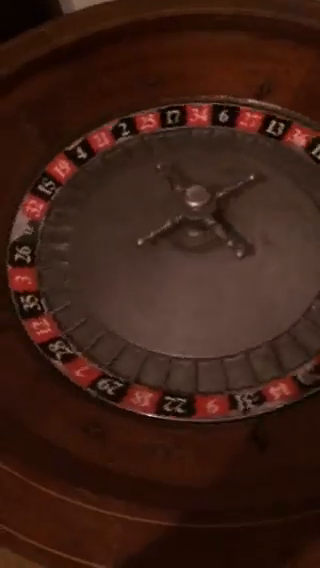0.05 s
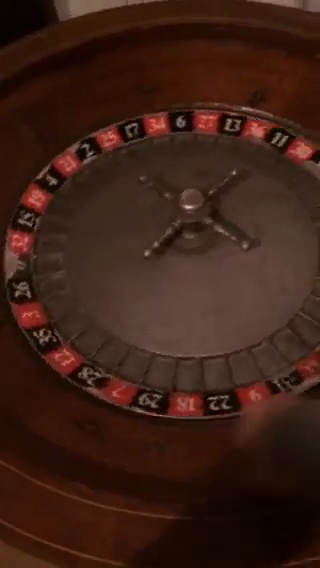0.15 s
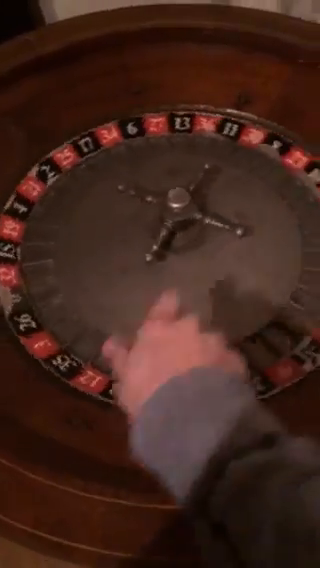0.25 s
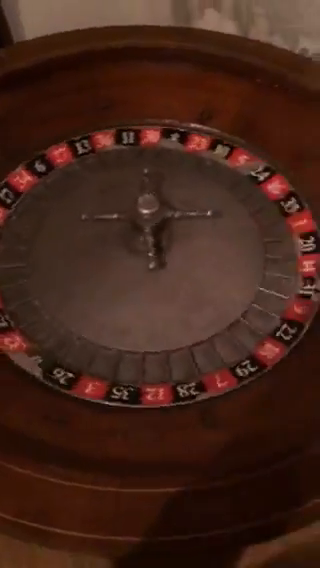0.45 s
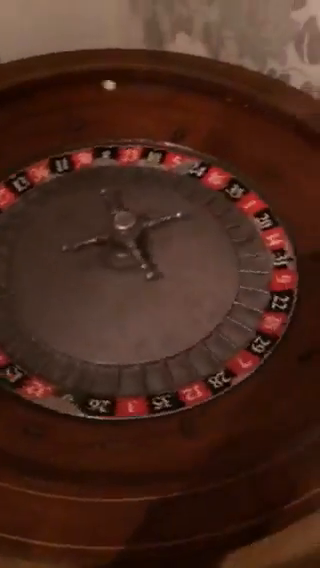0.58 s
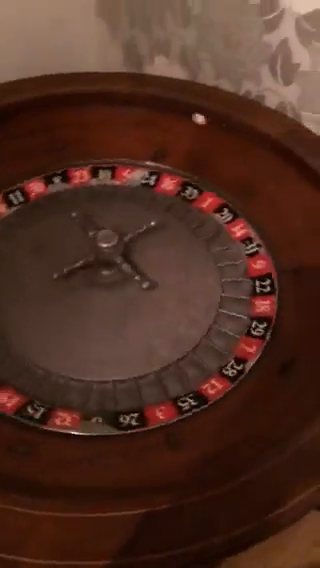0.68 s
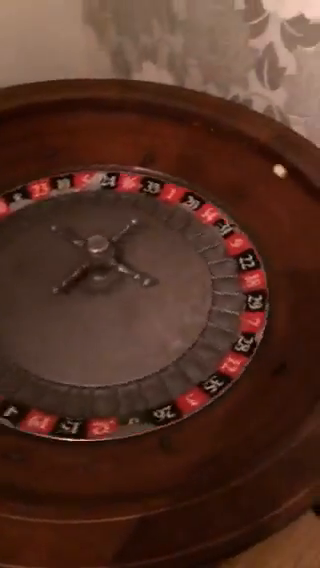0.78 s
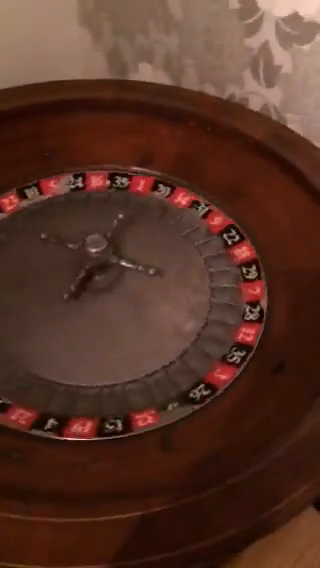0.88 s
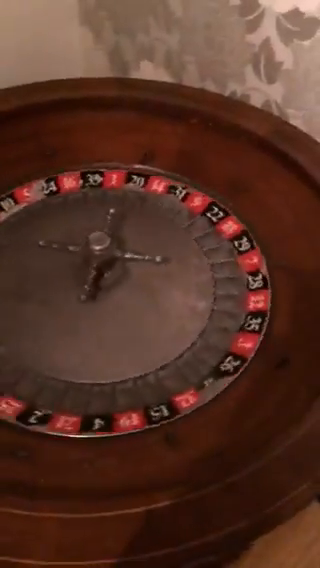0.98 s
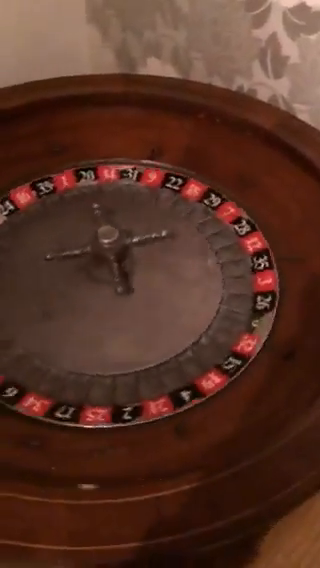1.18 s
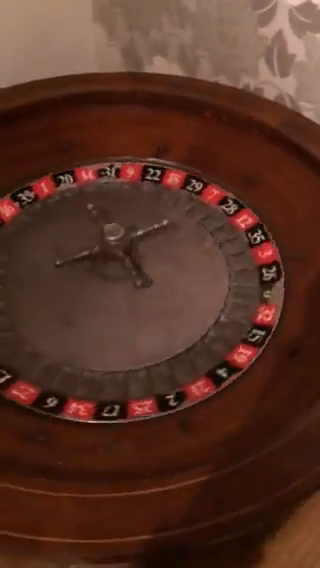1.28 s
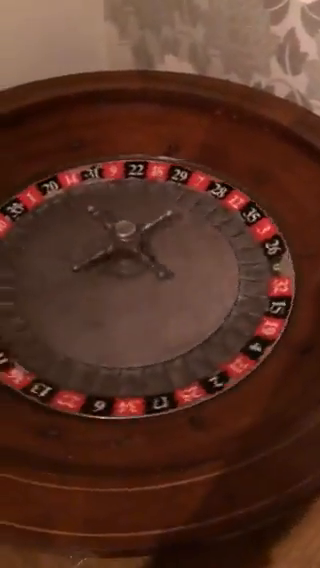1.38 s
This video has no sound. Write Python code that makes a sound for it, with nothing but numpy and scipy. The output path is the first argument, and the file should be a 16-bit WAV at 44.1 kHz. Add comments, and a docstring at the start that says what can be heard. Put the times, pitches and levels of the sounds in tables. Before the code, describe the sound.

A roulette ball skips and rolls around a wooden bowl in a quiet room. Two very faint fingertip taps come first, then a soft sleeve swish and a first knock at about 0.2 seconds. The ball clacks sharply at 0.3 seconds. Quick, uneven clicks follow, gradually weakening over a hollow rolling rumble that shifts in tone and continues to about 1.5 seconds, with a short echo.

```python
"""A small hard ball skips and rolls round the rim of a wooden roulette bowl in a quiet furnished room.
Fingertips tap the wood, a sleeve brushes past, and the ball clacks onto the track. Each hit rings
the struck spot and the whole bowl. Between hits, the grain of the track jolts the rolling ball and
keeps the wood ringing, in a tone that shifts as it circles. The room adds a short echo and faint hiss."""
import sys
import numpy as np
from scipy import signal
from scipy.fft import rfft, irfft, next_fast_len
from scipy.io import wavfile
from scipy.ndimage import map_coordinates

SR = 44100
rng = np.random.default_rng(int(sys.argv[2]) if len(sys.argv) > 2 else 0)


def put_to_file(sound):
    """Save the sound as 16-bit audio at rate SR, in the file named by the first command-line argument."""
    columns = np.atleast_2d(sound).T  # one column per channel
    safe = np.clip(columns, -1, 1)
    whole_steps = np.round(safe * 32767)
    wavfile.write(sys.argv[1], SR, whole_steps.astype(np.int16))


N = 63945

# Background hiss: f/Hz, level/dB
AIR_SPECTRUM = [(20, -10), (60, 1.5), (100, -23), (180, -3.5), (320, -20), (430, -1.5), (700, -27),
                (2000, -27.5), (4200, -25), (8000, -31.5), (12000, -33), (15100, -37)]
# The bowl's own notes: f/Hz, level/dB, fade/s (time to drop 60 dB; ringing() limits it)
BOWL_NOTES = [(187.6, -7.5, 0.17), (395.2, 3, 0.53), (432.8, 2, 0.4), (697.6, -1.5, 0.18), (789, -8, 0.061),
              (910, -3, 0.14), (1052, 1, 0.24), (1370, -45, 0.11), (1700, -46, 0.1), (1962, 14, 0.043),
              (2157, 7, 0.079), (2410, 0, 0.21), (2800, 6.5, 0.026), (3370, -42, 0.017)]
# How far those notes stray from spot to spot: f/Hz, spread/fraction of the pitch
PITCH_SPREAD = [(450, .003), (700, .03)]
# The wood's blur of crowded notes: f/Hz, level/dB
WOOD_SPECTRUM = [(60, -49), (130, -16), (210, -7.5), (270, -12.5), (340, -38), (400, -6), (480, -10.5),
                 (560, -11.5), (800, -2.5), (1960, 2), (2860, -4.5), (4600, -23.5), (5600, -30),
                 (7500, -33), (10000, -30.5), (12000, -34.5), (15000, -51)]
# How long that blur lasts: f/Hz, fade/s
WOOD_FADE = [(200, 0.27), (900, 0.11), (2000, 0.064), (4000, 0.058), (10000, 0.037)]
# The four bands of a knock (low ring, high ring, crack, tick): f/Hz
KNOCK_BANDS = (850, 2050, 4200, 9000)
# Fingertips on the wood: t/s, level/dB
FINGER_TAPS = [(0.014, -43), (0.119, -44.5)]
# Their tone: spot f/Hz, spot level/dB, snap/dB, then level/dB for each of the four bands
TAP_TONE = (691, -1.5, 6, -4, -21.5, -31, -45)
# The ball's landings: t/s, level/dB, then the same columns as TAP_TONE
BALL_SKIPS = [(0.21, -20, 1170, -14, -4, -2.5, -8.5, -35, -57),
              (0.287, -4.5, 1078, -4, 25.5, -8, -7, -9.5, -33),
              (0.304, -15.5, 927, 8, 13, -3, -12, -18, -50),
              (0.329, -11, 2340, -39, 25, -7.5, 1.5, -19, -33),
              (0.362, -16, 1020, -11, 2, -8.5, -11, -19, -48),
              (0.383, -21, 2020, -13, 13, -6.5, -1, -16, -30.5),
              (0.416, -17, 1780, -9, -5, -7, -1, -26, -42), (0.438, -20, 1250, -1, 29, -12, 5, -19, -37),
              (0.467, -20.5, 2150, -8, 24, -16, 1, -16, -39),
              (0.496, -25, 2080, -5, 10, -20, -15, -36, -50),
              (0.504, -28.5, 1520, -3, -6, -10, -8, -25, -47), (0.522, -26.5, 2100, 5, 29, 20, 3, -30, -48),
              (0.538, -26, 2010, -2, 10, -3, -7, -51, -71), (0.564, -25.5, 1830, -18, -10, 3, 5, -17, -50),
              (0.588, -22.5, 1990, -21, -11, -18, -6.5, -22, -43.5),
              (0.61, -25.5, 1210, -16, -1, 1, -2, -21, -53), (0.628, -22, 893, 4, -2, -8, -6, -20, -40.5),
              (0.644, -25.5, 1360, -7, 0, -6, -2, -25, -46), (0.674, -22, 928, -1.5, 10, -2, 2, -31, -41),
              (0.692, -22, 940, -25, 6, -2.5, 3, -23, -45), (0.713, -28.5, 1070, 6, 14, -12, 20, -4, -37),
              (0.74, -16.5, 1848, -1, 15.5, -3, -5, -15, -40),
              (0.79, -18.5, 2150, -4, 34, -17, 2, -30, -38),
              (0.818, -25.5, 1793, -3, -14, -9.5, -4, -37, -36),
              (0.847, -22.5, 1008, 0, -4, -12, -5, -19, -39.5), (0.858, -26.5, 988, 0, 10, 0, -6, -29, -43),
              (0.88, -22.5, 1032, 0, 5, 3.5, 3, -14.5, -30.5),
              (0.912, -22.5, 890, -6, 3, -5.5, -2, -25, -65),
              (0.942, -28.5, 1875, 7, 23, -7, -4, -21, -32.5),
              (0.963, -23, 1725, -23, 16, -10, -6.5, -34, -53),
              (1.01, -20.5, 905, -13, 9, -2.5, -3.5, -24.5, -42.5),
              (1.057, -21.5, 1030, -4, 22, -0.5, -2, -25, -38.5),
              (1.092, -24.5, 1274, -9, 2, -5, -8.5, -11, -47), (1.128, -26.5, 682, 9, -8, -7, 9, -17, -63),
              (1.155, -26, 718, 2.5, -3, -11, -1, -20, -56),
              (1.18, -33.5, 1850, -11, -13, -15, -5, -21, -34), (1.19, -26, 796, -5, 20, 0, -21, -31, -60),
              (1.234, -27.5, 1060, -1, 3, -1, -5, -25, -40), (1.247, -32.5, 930, -15, 19, -11, 0, -27, -34),
              (1.27, -32, 1230, 5, -9, -5, -2, -24, -49), (1.291, -30.5, 1090, 2.5, 5, -6, -1, -34, -48),
              (1.299, -31.5, 1490, -9, -6, -5, -4, -22, -36),
              (1.318, -29.5, 1290, -1, -14, -2, -6, -46, -52),
              (1.345, -31.5, 2010, -7, 13, -11, 14, -15, -28), (1.362, -39, 1950, 6, 12, -20, 10, -33, -47),
              (1.376, -36, 2080, -4, 12, -12, -1, -16, -30), (1.395, -36, 1270, -8, 5, -7, 7, -13, -35),
              (1.425, -31.5, 1380, -5, 11, -6, 0, -16, -32.5)]
# How long the room echoes: f/Hz, fade/s
ROOM_FADE = [(200, 0.76), (2000, 0.46), (10000, 0.14)]
# The rolling ball: t/s, level/dB, brightness (0.83 dB of treble per step), hollow boom/dB
ROLL_PATH = [(.117, -52, -2, -6), (.13, -49, -25, -24), (.18, -51.5, -3, 7), (.2, -40, 0, 1),
             (.208, -32, -8, 15.5), (.235, -33, -2, 5.5), (.28, -29.5, 5, 7.5), (.38, -36.5, -8, 5.5),
             (.45, -35, -2, 5), (.6, -34.5, -11, -0.5), (.73, -39.5, -27, 9), (.84, -43, -4, 2.5),
             (1, -36, -28, -1), (1.11, -36, -21, -11), (1.19, -37.5, -23, 17.5), (1.26, -43, 3, -17),
             (1.36, -40, -33, 3.5), (1.45, -34.5, -4, 3.5)]
# The sleeve's rustle: t/s, level/dB
SLEEVE_LEVELS = [(.117, -68), (.18, -64), (.21, -50.5), (.24, -45.5), (.27, -52), (.3, -49.5), (.4, -62),
                 (.7, -67.5), (1.45, -68.5)]
# The tone of the cloth: f/Hz, level/dB
CLOTH_SPECTRUM = [(1760, -12), (3000, -5.5), (3650, -3), (4550, -9.5), (7060, -11), (15000, -26)]


def amp(db):
    """Turn decibels into a multiplier."""
    return 10 ** (np.asarray(db) / 20)


def unit(x):
    """Scale a sound to an average (rms) strength of 1."""
    return x / np.sqrt(np.mean(x ** 2) + 1e-20)


def along(points, hz):
    """Read between the rows of a (frequency, value) table, on a musical pitch scale."""
    freqs, values = np.transpose(points)
    return np.interp(np.log(hz + 1), np.log(freqs + 1), values)


def curves(rows):
    """Turn each column after the time into a curve, held 40 lower before the first row."""
    times, *columns = np.transpose(rows)
    return [np.interp(np.arange(N) / SR, times, c, left=c[0] - 40) for c in columns]


def wobble(rate):
    """A smooth curve through `rate` random points a second."""
    points = rng.standard_normal(int(N * rate / SR) + 4)
    return map_coordinates(points, [np.arange(N) * rate / SR])


def filtered(x, gain):
    """Turn each frequency f up or down by gain(f)."""
    size = next_fast_len(x.shape[-1] + 8192)
    return irfft(rfft(x, size) * gain(np.fft.rfftfreq(size, 1 / SR)), size)[..., :x.shape[-1]]


def fading_noise(spectrum_db, fades, size):
    """A burst of noise, with energy 1, in which each band fades at its own speed."""
    hz, t, bands = signal.stft(rng.standard_normal(size), SR, nperseg=128)
    bands = bands * amp(-60 * t / along(fades, hz)[:, None])
    burst = signal.istft(bands, SR, nperseg=128)[1][:size]
    soft_start = np.clip(np.arange(size) / (.0008 * SR), 0, 1) ** 2
    burst = filtered(burst, lambda f: amp(spectrum_db(f))) * soft_start
    return burst / np.linalg.norm(burst)


def roaming(x, new_ring, step_s):
    """Give each overlapping piece of a sound a fresh ring, as the ball moves on."""
    hop = round(step_s * SR)
    out, fade = np.zeros(N + 2 * SR), np.hanning(2 * hop + 1)[:-1]
    padded = np.pad(x, (hop, 2 * hop))
    for start in range(0, N + hop, hop):
        piece = signal.fftconvolve(padded[start:start + 2 * hop] * fade, new_ring())
        out[start:start + len(piece)] += piece
    return out[hop:hop + N]


def air():
    """The quiet room and the microphone hiss softly, wavering a little."""
    hiss = filtered(rng.standard_normal(N), lambda f: amp(along(AIR_SPECTRUM, f)))
    return amp(-63.5 + wobble(10.8)) * unit(hiss)


def ringing(t, tone_db, scatter_db):
    """The bowl's notes ring and fade; each spot sets them off at slightly different levels and pitches."""
    hz, db, fade_s = np.transpose(BOWL_NOTES)[:, :, None]
    level_luck, pitch_luck = rng.standard_normal((2, *hz.shape))
    db = db + tone_db(hz) + scatter_db * level_luck - 60 * t / np.clip(fade_s, .02, .3)
    hz = hz * (1 + along(PITCH_SPREAD, hz) * pitch_luck)
    ring = (amp(db) * np.sin(2 * np.pi * hz * t)).sum(0)
    return ring / np.linalg.norm(ring)


def knock(spot_hz, spot_db, snap_db, *band_db):
    """One short blow rings the struck spot, the bowl's notes and the wood's blur of notes."""
    spot_fade_s, tick_fade_s, rise_s, snap_s, blow_cycles = .036, .056, .0012, .023, 1.3
    t = np.arange(SR // 4) / SR
    band_boosts = [(hz, db - along(WOOD_SPECTRUM, hz)) for hz, db in zip(KNOCK_BANDS, band_db)]
    bass_loss = [(250, -16.5), (600, 0)]  # a light hit hardly moves the lowest notes
    tone_db = lambda f: along(band_boosts, f) + along(bass_loss, f)
    notes = ringing(t, tone_db, scatter_db=5.5)
    spot = amp(-60 * t / spot_fade_s) * np.sin(2 * np.pi * spot_hz * t)
    blur = fading_noise(lambda f: along(WOOD_SPECTRUM, f) + tone_db(f), WOOD_FADE, len(t))
    hit = amp(-3.5) * notes + amp(spot_db) * spot / np.linalg.norm(spot) + amp(.5) * blur
    hit *= 1 - np.exp(-t / rise_s)
    hit *= amp(snap_db * np.exp(-t / snap_s))  # snap makes the first instant louder or softer
    tick = filtered(blur, lambda f: f > 4500) * amp(-8 - 60 * t / tick_fade_s)
    hit += tick * amp(snap_db)
    swell = np.sin(np.pi * np.clip(t * spot_hz / blow_cycles, 0, 1)) ** 2
    blow = swell * np.cos(2 * np.pi * (spot_hz * t - blow_cycles / 2))
    hit += amp(-9) * np.linalg.norm(hit) * blow / np.linalg.norm(blow)
    return hit / (3 * np.sqrt(np.mean(hit[:SR // 100] ** 2)))  # peaks at roughly 1


def taps_and_skips():
    """Fingertips, then the bouncing ball, knock on the wood; the tone depends on where they land."""
    taps = [(time_s, db, *TAP_TONE) for time_s, db in FINGER_TAPS]
    out = np.zeros(N + SR)
    for time_s, db, *tone in [*BALL_SKIPS, *taps]:
        hit = knock(*tone)
        start = round((time_s - .001) * SR)
        out[start:start + len(hit)] += amp(db) * hit
    bass_cut = signal.butter(3, 370, "high", fs=SR, output="sos")
    return signal.sosfilt(bass_cut, out[:N])


def bowl_sound(shaking):
    """The bowl passes its shaking to the air, but gives off little deep bass or sound just under its hum."""
    lowest_hz, dip_hz, width_hz, depth = 108, 325, 90, .7
    sound = filtered(shaking, lambda f: 1 / np.sqrt(1 + (lowest_hz / (f + 1)) ** 8))
    dip = lambda f: 1j * f * width_hz / (dip_hz ** 2 - f * f + 1j * f * width_hz)
    return filtered(sound, lambda f: 1 - depth * dip(f))


def room_echo(sound):
    """The room answers about 7 ms late, with an echo that changes as the ball moves."""
    new_echo = lambda: np.pad(fading_noise(np.zeros_like, ROOM_FADE, SR // 2), (300, 0))
    return amp(-6.5) * roaming(sound, new_echo, step_s=.12)


def track_ring():
    """How one random spot on the track rings when jolted: the bowl's notes plus the wood's blur."""
    t = np.arange(SR // 4) / SR
    notes = ringing(t, lambda f: along([(1750, 0), (3500, -8)], f), scatter_db=4)
    return amp(-5) * notes + fading_noise(lambda f: along(WOOD_SPECTRUM, f), WOOD_FADE, len(t))


def rolling():
    """The grain of the track jolts the ball, which rings one spot after another as it circles."""
    jolts_per_s, jolt_range_db, scrape = 200, 14, .24
    treble_hz, hollow_hz, hollow_width_hz = 1500, 750, 230
    level_db, brightness, boom_db = curves(ROLL_PATH)
    chance, strength = rng.random((2, N))
    jolts = (chance < jolts_per_s / SR) * amp(jolt_range_db * strength)
    jolts *= np.sign(rng.standard_normal(N))
    force = unit(jolts) + scrape * rng.standard_normal(N)
    ring = unit(roaming(force, track_ring, step_s=.03))
    low = filtered(ring, lambda f: 1 / (1 + (f / treble_hz) ** 4))
    roll = unit(low + amp(.83 * brightness) * (ring - low))
    hollow = filtered(roll, lambda f: np.exp(-((f - hollow_hz) / hollow_width_hz) ** 2))
    grit_spectrum = [(2500, -40), (5000, 0), (15200, -12)]  # the jolts' own treble
    click = fading_noise(lambda f: along(grit_spectrum, f), [(5000, .012)], SR // 20)
    grit = signal.fftconvolve(force, click)[:N]
    return amp(level_db - 7) * (roll + (amp(boom_db) - 1) * hollow + amp(-30) * unit(grit))


def sleeve():
    """The cuff brushes past with a fluttering hiss as the hand flicks and draws away."""
    level_db, = curves(SLEEVE_LEVELS)
    hiss = filtered(rng.standard_normal(N), lambda f: amp(along([(1000, -30), *CLOTH_SPECTRUM], f)))
    flutter_db = 1.5 * wobble(70)
    return amp(level_db + flutter_db) * unit(hiss)


def scene():
    """The bowl, its echo, the sleeve and the air, added into one channel."""
    bowl = bowl_sound(taps_and_skips() + rolling())
    return (bowl + room_echo(bowl) + sleeve() + air())[None]


def record(dry):
    """The microphone is thin in the bass and picks up nothing above its top frequency."""
    bass_hz, top_hz = 70, 15200
    return filtered(dry, lambda f: (f < top_hz) / np.sqrt(1 + (bass_hz / (f + 1)) ** 4))


dry = scene()
out = record(dry)
put_to_file(out)
```